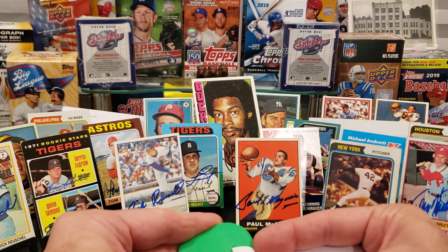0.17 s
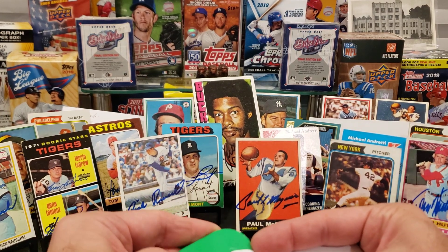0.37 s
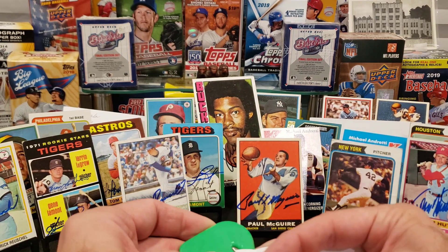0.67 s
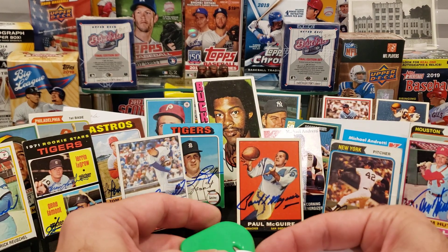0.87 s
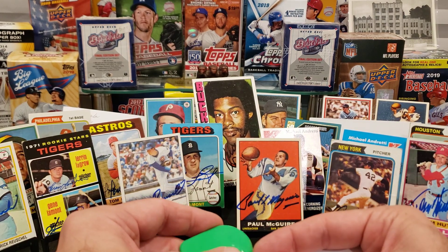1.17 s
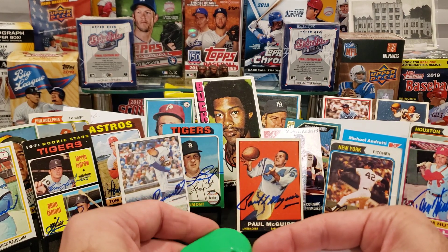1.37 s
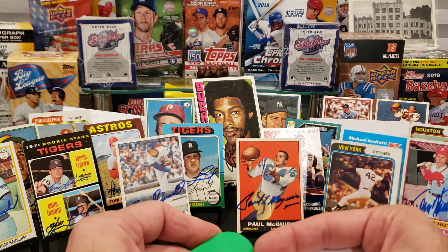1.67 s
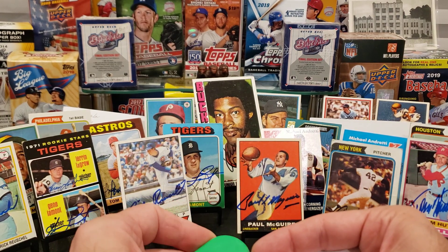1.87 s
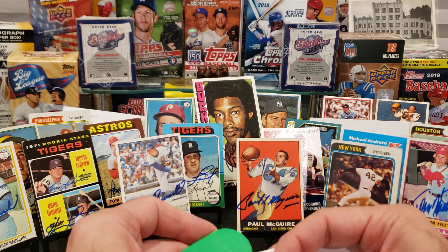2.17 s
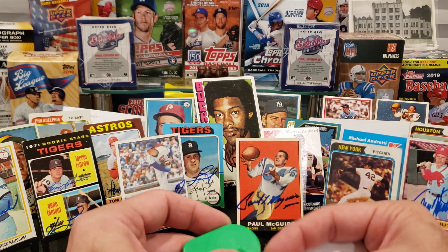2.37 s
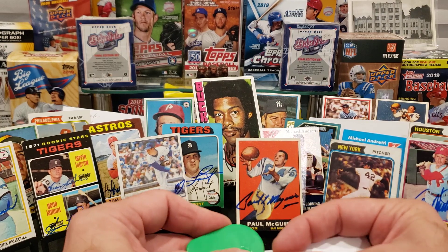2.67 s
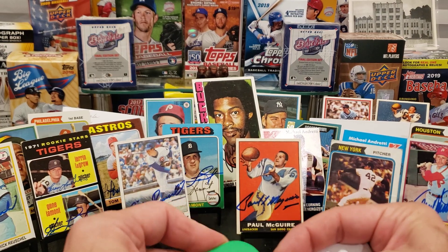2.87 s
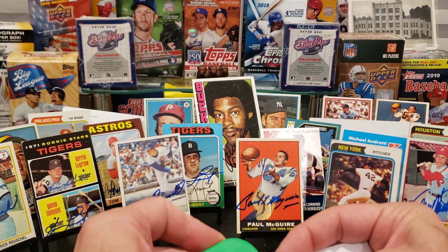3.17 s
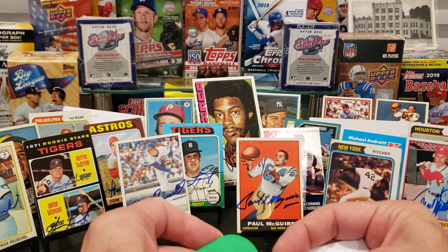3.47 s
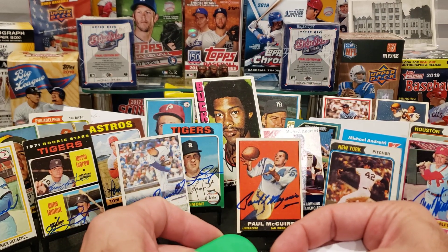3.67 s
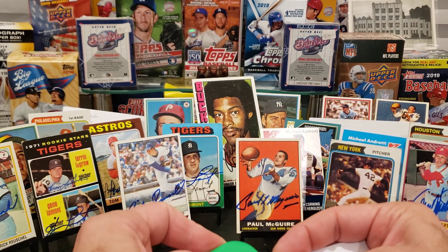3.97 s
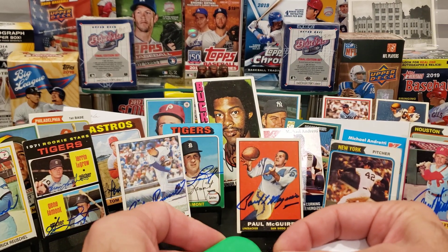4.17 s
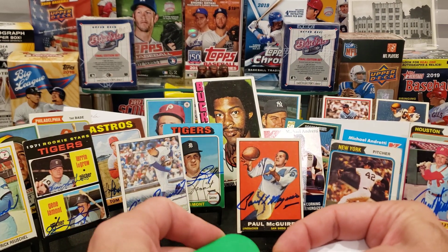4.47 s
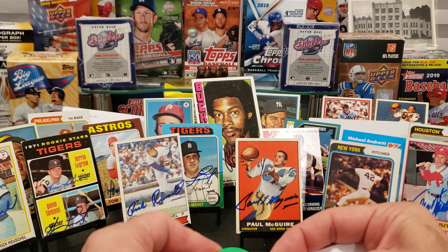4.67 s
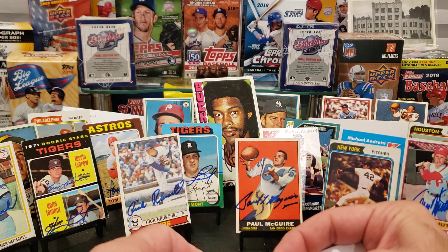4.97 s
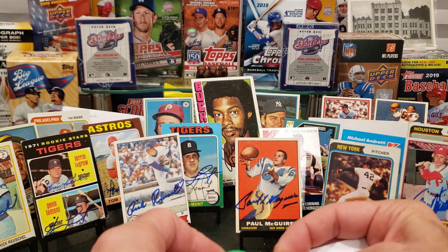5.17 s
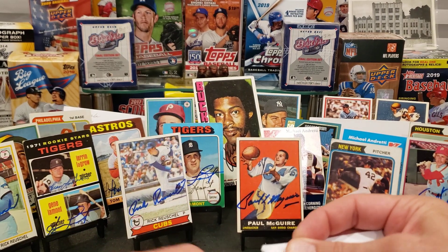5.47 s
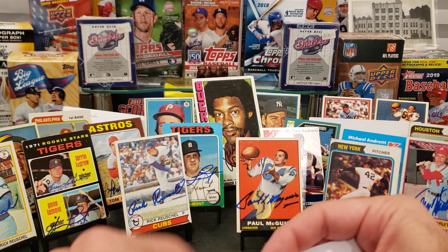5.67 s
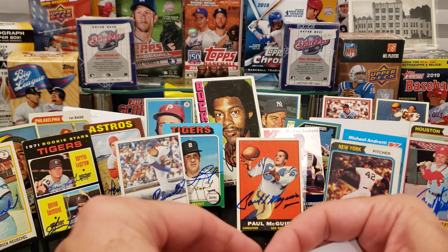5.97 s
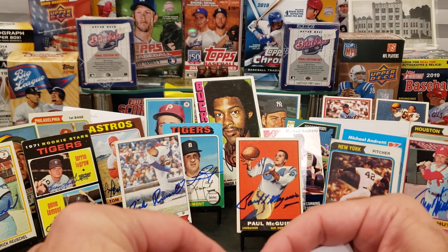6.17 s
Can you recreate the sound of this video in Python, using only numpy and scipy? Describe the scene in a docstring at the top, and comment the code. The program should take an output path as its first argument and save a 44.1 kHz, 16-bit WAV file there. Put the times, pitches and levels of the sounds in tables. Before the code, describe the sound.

Close stereo pickup at a table in a small room. Fingers and a small plastic opener work at a paper envelope: faint scrapes, tiny creases, an early sharp tap with a click, a bump and click on the left a little after two seconds. Crinkles thicken near five seconds, then the fold pops and rips loudly in two jerks, flaps loose and settles. A soft fan hums and hisses to the left.

```python
"""Opening a paper envelope at a table

Close to a stereo pair: an envelope turns in the hands while a small plastic opener works under its flap.
Creases pop and crack as damped modes and noise bursts; strokes scrape as grainy noise; slips swish downward.
The opener taps, bumps and clicks; the fold gives with a pop, rips open and flaps loose in short damped knocks.
The table rings in low modes, a small room answers with noise tails, and a fan hums and hisses to the left."""
import sys
import numpy as np
from scipy import signal
from scipy.fft import rfft, irfft, next_fast_len
from scipy.io import wavfile
from scipy.ndimage import map_coordinates

SR = 44100
rng = np.random.default_rng(int(sys.argv[2]) if len(sys.argv) > 2 else 0)


def master_out(mix):
    """Clip the mix to full scale and print it as 16-bit PCM to the path in sys.argv[1]."""
    frames = np.transpose(np.atleast_2d(mix))
    ceiling = np.clip(frames, -1, 1)
    pcm = np.round(ceiling * 32767).astype(np.int16)
    wavfile.write(sys.argv[1], SR, pcm)


N = 278491
TIME = np.arange(N) / SR
# time axis of one short transient
BLOW = np.arange(4096) / SR

# paper buckles: (time [s], hollow pop level [dB], crack level [dB], fizz level [dB]), before trims
BUCKLES = [(0.021, -50, -81, -93), (0.1201, -47, -54.5, -60), (0.283, -42, -44.5, -58),
           (0.3009, -37.5, -43, -48), (0.4449, -51, -53, -75), (0.457, -47, -55, -70),
           (0.732, -58, -50.5, -52.5), (1.3106, -51.5, -61.5, -80), (1.5177, -52, -82, -58),
           (1.613, -50, -65, -86), (1.7525, -54, -54, -62), (2.0839, -43, -71, -59.5),
           (2.246, -60, -66, -66), (2.309, -53, -50.5, -47.5), (2.348, -74, -71, -55),
           (2.42, -42.5, -44, -40.5), (2.6246, -46.5, -59.5, -80), (2.7127, -51.5, -60.5, -77),
           (2.8116, -36.5, -52, -58), (3.099, -42, -55, -58), (3.1478, -48.5, -44.5, -40.5),
           (3.5114, -49.5, -55.5, -53), (3.904, -54, -62, -57), (4.0442, -47, -66, -77),
           (4.141, -47, -67, -86), (4.5133, -61, -53, -47.5), (4.735, -51.5, -70, -75),
           (4.7812, -53, -63, -69), (4.8705, -42.5, -39.5, -36.5), (4.8856, -38.5, -60, -50),
           (4.8986, -44, -53, -42), (4.9406, -42.5, -77, -61.5), (4.9831, -34, -35.5, -40.5),
           (4.9941, -35.5, -37, -35.5), (5.0714, -54, -47.5, -47), (5.1965, -36.5, -54, -52),
           (5.337, -41, -37, -49), (5.3585, -35, -35, -29.5), (5.5735, -15, -25, -30),
           (5.6516, -38, -39, -43.5), (5.6666, -26, -25, -19), (5.688, -28, -29, -52),
           (5.733, -35, -35, -48), (5.766, -37, -43.5, -58), (5.8229, -47, -44, -51),
           (5.8433, -43, -41.5, -47.5)]
# buckling wanders along the fold, mostly left to right: (time [s], left over right [dB])
BUCKLE_PAN = [(4.8, 5.5), (5.35, -0.5), (5.57, 3), (5.7, -4.5)]
# delay between the microphone ports as the flap tears: (time [s], lead of the left port [samples])
LEFT_LEAD = [(5.45, 1), (5.55, 3)]
# paper slides under fingers or blade:
# (start [s], length [s], fibre scrape [dB], sheet flexing [dB], top-octave sheen over scrape [dB])
STROKES = [(0, 0.13, -68.5, -64, 0), (0.095, .45, -60.5, -55.5, -7), (0.283, .024, -48, -43.5, -5),
           (0.43, .025, -58, -54, -10), (0.487, 0.042, -61.5, -55, 6.5), (0.557, .12, -72, -62.5, -2),
           (0.666, .035, -53.5, -53, -2), (1.235, 0.03, -63, -71, 4), (1.478, 0.038, -62, -73, 5),
           (1.648, 0.084, -76, -57.5, -3), (1.726, 0.025, -59, -62, -3.5), (2.03, .3, -66.5, -69.5, 4.5),
           (2.328, 0.1, -59, -65, 4), (2.46, 0.19, -67, -68, 2), (2.55, 0.044, -56, -65, -2),
           (2.655, 0.29, -63.5, -65.5, -2), (2.81, 0.023, -53, -62, 3), (2.946, 0.047, -53, -57, 1),
           (3.094, 0.13, -60, -63, 1), (3.132, .025, -46, -54, 4), (3.232, 0.25, -68.5, -68.5, 0.5),
           (3.497, 0.055, -66, -64.5, 1), (3.87, 0.065, -56, -67.5, 0.5), (3.945, .2, -67.5, -68.5, 1.5),
           (4.284, .1, -67.5, -70, 0.5), (4.385, 0.071, -52.5, -71, -4), (4.498, 0.039, -48.5, -53, 2.5),
           (4.57, 0.37, -63, -65.5, 0), (4.616, 0.026, -61.5, -70, 10), (4.77, .08, -58, -56.5, 2.5),
           (4.859, 0.028, -44.5, -49, 2.5), (4.982, .027, -44, -49.5, 1), (5.02, .1, -63, -57, -2),
           (5.188, .02, -54, -46, 2), (5.22, .035, -46, -52, 3), (5.27, 0.044, -62, -61, 3.5),
           (5.32, .02, -37, -36, -5), (5.348, .016, -34, -39, 2), (5.39, 0.077, -64.5, -51, 0),
           (5.48, 0.084, -64.5, -63, 4), (5.923, 0.12, -71.5, -67, 1), (6.144, 0.082, -59, -71, -0.5)]
# hands shift their grip: (start [s], length [s], rumble level [dB])
GRIP_SHIFTS = [(0.15, 0.24, -60), (0.501, .04, -51.5), (1.29, .1, -63), (1.583, 0.25, -63.5),
               (2.304, 0.072, -53), (2.8, .22, -68), (3.022, .46, -58.5), (3.977, 0.39, -64.5),
               (4.522, 0.094, -55), (4.845, 0.45, -57.5), (4.99, .12, -53.5), (5.357, 0.11, -46)]
# the fold gives in two jerks: (time [s], fibre scrape [dB], sheet flexing [dB])
TEARS = [(5.573, -35.5, -27), (5.663, -25.5, -31)]
# the freed sheet shakes: (start [s], length [s], sheet flexing [dB], rumble [dB])
FREE_SHAKE = (5.563, .34, -41, -31)
# paper slips over paper: (start [s], length [s], starting pitch [Hz], final pitch [Hz], level [dB])
SLIPS = [(2.977, .11, 1002, 558, -63.5), (3.248, 0.16, 780, 476.5, -65.5), (5.04, 0.023, 900, 600, -49),
         (5.08, .05, 700, 400, -52), (5.12, .085, 1850, 1180, -52), (5.215, 0.042, 2025, 1450, -56.5),
         (5.258, .04, 700, 480, -56), (5.381, .1, 937, 485, -52.5), (6.168, 0.094, 1600, 1031, -62.5)]
# short damped knocks, the opener taps the paper and the envelope flaps:
# (time [s], level [dB], pitch [Hz], t60 [s])
TAPS_AND_FLAPS = [(0.2845, -23.5, 1760, 0.0045), (3.9057, -27.5, 2090, 0.0052), (4.781, -39.5, 497, 0.039),
                  (5.5734, -18.5, 410, 0.042), (5.6125, -26, 820, 0.026), (5.672, -18, 360, 0.054),
                  (5.677, -15.5, 704, 0.049), (5.688, -15, 406, 0.0064), (5.745, -17, 297, 0.019),
                  (5.796, -29.5, 600, 0.022), (5.82, -28, 260, 0.034), (5.834, -31, 750, 0.025),
                  (5.866, -20.5, 290, 0.015), (5.898, -22.5, 556, 0.018), (5.8982, -28, 200, .032),
                  (5.95, -39, 450, .025)]
# the opener bumps the table edge: (time [s], level [dB], left over right [dB])
EDGE_BUMP = (2.3226, -26.5, 15.6)
# modes of that bump: (frequency [Hz], level [dB], t60 [s])
EDGE_BUMP_MODES = [(175, -7.5, .04), (600, 0, .014), (1050, -1.5, .009), (1600, 0, 0.0027)]
# the opener's shell clicks: (time [s], level [dB], left over right [dB])
SHELL_CLICKS = [(0.2832, -35, 2), (2.3712, -27, 13)]
# modes of the plastic shell: (frequency [Hz], level [dB], t60 [s])
SHELL_MODES = [(2840, -3.5, .016), (3400, -0.5, .019)]

# colours of the paper, all as (frequency [Hz], spectral level [dB per Hz])
# fibres scraping
SCRAPE_COLOUR = [(600, -32.5), (1300, -3), (1800, -4), (2400, -0.5), (4200, -0.5), (5900, -1.5), (8300, -6),
                 (10300, -5), (12400, -2), (15500, -5.5)]
# sheet flexing
FLEX_COLOUR = [(50, -62.5), (250, -20), (480, -2), (780, -1.5), (1150, -1), (1650, -3), (2400, -10),
               (5000, -59)]
# low rumble of the handling
RUMBLE_COLOUR = [(20, -39.5), (50, 11), (85, 3.5), (125, 6), (160, -.5), (195, 3), (260, 0), (360, -0.5),
                 (480, -6), (700, -20), (1500, -50)]
# fibres cracking at a crease
CRACK_COLOUR = [(1100, -32.5), (1900, -1.5), (2600, -1), (4200, 1.5), (6200, -2.5), (9000, -22)]
# the highest part of a crease
FIZZ_COLOUR = [(4500, -32), (7500, -2), (10500, 2), (12500, 3), (16000, -1)]
# scrape as heard by the right port: (frequency [Hz], gain [dB])
RIGHT_TINT = [(2000, -2.5), (5000, 1), (8000, -3), (13000, 4.0)]
# soft bumps of the hands on the table: (frequency [Hz], gain [dB])
HAND_BUMP_COLOUR = [(20, -14.5), (45, 3.0), (75, 3.5), (130, -8), (250, -36)]
# deep bass that a small sheet fails to radiate: (frequency [Hz], gain [dB])
SHEET_LOW_CUT = [(20, -36), (40, -20), (70, -8), (130, 0)]

# the table top rings: (frequency [Hz], width [Hz], gain [dB])
TABLE_MODES = [(120.7, 8.9, 4), (194.3, 6.8, 10.5), (362.8, 6.1, 7), (490, 9.2, 1.5), (698, 5.7, 1.5),
               (816, 7, 4), (1019, 4.7, -18)]
# decay of the room: (frequency [Hz], t60 [s])
ROOM_DECAY = [(150, 0.097), (1000, 0.25), (4000, 0.3), (14000, 0.26)]
# difference between the ports in the room tail: (frequency [Hz], gain [dB])
ROOM_SIDE = [(200, -13), (700, -2.5), (2000, 3.5), (4000, -0.5)]
# air moved by the fan: (frequency [Hz], spectral level [dB per Hz])
FAN_AIR_COLOUR = [(20, -10), (45, 8), (120, -0.5), (170, -4), (300, -8), (440, -7.5), (600, -44.5),
                  (1100, -21.5), (3000, -44.5), (8000, -40), (12500, -28), (16000, -24)]
# hiss in the fan's air vents: (frequency [Hz], spectral level [dB per Hz])
FAN_HISS_COLOUR = [(800, -26), (1300, -10.5), (1700, -1.5), (1980, 2), (2250, -2), (2550, -13.5),
                   (2900, -30), (4000, -44)]
# fan motor tones: (frequency [Hz], rms level before flutter and pan [dB])
FAN_TONES = [(118.4, -82), (242.2, -78), (296.1, -71)]

# every hand movement swells, holds and dies away
ATTACK_S, RELEASE_DB_PER_S = 0.019, 328.5
# fingers resting on the paper between movements, before trims
REST_SCRAPE_DB, REST_FLEX_DB, REST_RUMBLE_DB = -76, -79.5, -68
# a tear starts suddenly and fades; its sheen is relative to its scrape
TEAR_ATTACK_S, TEAR_SCRAPE_DB_PER_S, TEAR_FLEX_DB_PER_S, TEAR_SHEEN_DB = 0.0046, 230, 140.5, -4
SHAKE_SAG_DB_PER_S = 7.5
# the sheen of the scrape lies above this frequency
SHEEN_HZ = 7980
# tiny crinkles while the paper slides: rate, level against the friction, life
CRINKLES_PER_S, CRINKLE_DB, CRINKLE_S = 30, -7, .0018
# band limit of the recorder
TOP_HZ = 16000


def snaps():
    """Each buckle thumps the air pocket of the envelope and cracks the fibres at the crease."""
    pops, cracks = np.zeros((2, 2, N))
    for s, pop_db, crack_db, fizz_db in BUCKLES:
        pocket_hz = 1160 * np.exp(.06 * rng.standard_normal())
        # a hard buckle is a single shove; a light one lets the pocket ring
        t60 = np.interp(pop_db, [-42, -18], [.0068, .0036])
        pop = amp(pop_db - 2.5) * burst(ring(pocket_hz, t60, attack=.0003))
        add(pops, s, panned(pop, np.interp(s, *np.transpose(BUCKLE_PAN))))

        # the bending wave crosses the sheet and leaves a brief shiver
        decay = np.exp(-BLOW / 0.0013) + 0.082 * np.exp(-BLOW / 0.015)
        crack = burst(coloured(pair(len(BLOW), apart=1.0) * decay, CRACK_COLOUR))
        fizz = burst(coloured(pair(len(BLOW), apart=0.49) * decay, FIZZ_COLOUR))
        add(cracks, s, amp(crack_db + 2.0) * crack)
        add(cracks, s, panned(amp(fizz_db + 1.4) * fizz, pan_db=-4.5))
    return pops + off_centre(cracks)


def rubbing():
    """Fibres catch and let go under the blade and fingers; the sheet flexes and the hands shift."""
    scrape_db, sheen_db, flex_db, rumble_db = handling()
    catches = grains(rate=500, scatter_db=4.5, life=.0004, bed=.7)
    crinkles = amp(CRINKLE_DB) * grains(rate=CRINKLES_PER_S, scatter_db=3, life=CRINKLE_S, bed=0)

    fibres = pair(N, apart=1.0) * np.hypot(catches, crinkles)
    left = coloured(fibres[0], SCRAPE_COLOUR)
    right = coloured(coloured(fibres[1], SCRAPE_COLOUR), RIGHT_TINT)
    friction = off_centre(unit(np.array([left, right])))
    low_pass = signal.butter(2, SHEEN_HZ, fs=SR, output='sos')
    dull = signal.sosfiltfilt(low_pass, friction)
    sheen = friction - dull
    scrape = amp(scrape_db - 1.0) * dull + amp(sheen_db - 2.0) * sheen

    creases = np.hypot(grains(rate=300, scatter_db=3, life=.001, bed=.5), crinkles)
    flex_noise = coloured(pair(N, apart=0.78) * creases, FLEX_COLOUR)
    flex = amp(flex_db - 5.5) * unit(flex_noise)

    nudges = grains(rate=120, scatter_db=4.2, life=0.0029, bed=0.38)
    rumble_noise = coloured(pair(N, apart=0.3) * nudges, RUMBLE_COLOUR)
    rumble = amp(rumble_db - 5) * unit(rumble_noise)

    # the hands bump the table softly however loud the paper gets
    bump_noise = coloured(pair(N, apart=0.24), HAND_BUMP_COLOUR)
    bumps = amp(np.minimum(rumble_db, -52) - 10.0) * unit(bump_noise)
    return scrape + panned(flex + coloured(rumble, SHEET_LOW_CUT) + bumps, pan_db=2.5)


def handling():
    """Levels in dB of scrape, its sheen, flexing and rumble; all movements add in power."""
    rest = amp([REST_SCRAPE_DB, REST_SCRAPE_DB, REST_FLEX_DB, REST_RUMBLE_DB])
    scrape, sheen, flex, rumble = rest[:, None] ** 2 * np.ones(N)
    for s, length, scrape_db, flex_db, sheen_db in STROKES:
        power = movement(s, length) ** 2
        scrape += amp(scrape_db) ** 2 * power
        sheen += amp(scrape_db + sheen_db) ** 2 * power
        flex += amp(flex_db) ** 2 * power
    for s, length, db in GRIP_SHIFTS:
        rumble += (amp(db) * movement(s, length)) ** 2
    for s, scrape_db, flex_db in TEARS:
        power = (amp(scrape_db) * jerk(s, TEAR_SCRAPE_DB_PER_S)) ** 2
        scrape += power
        sheen += amp(TEAR_SHEEN_DB) ** 2 * power
        flex += (amp(flex_db) * jerk(s, TEAR_FLEX_DB_PER_S)) ** 2
    s, length, flex_db, rumble_db = FREE_SHAKE
    shake = movement(s, length) * jerk(s, SHAKE_SAG_DB_PER_S)
    flex += (amp(flex_db) * shake) ** 2
    rumble += (amp(rumble_db) * shake) ** 2
    return 10 * np.log10([scrape, sheen, flex, rumble])


def movement(start, length):
    """Envelope of a hand movement: eased attack, hold, release."""
    swell = .5 + .5 * np.tanh((TIME - start - ATTACK_S / 2) / (ATTACK_S / 2))
    return swell * amp(-RELEASE_DB_PER_S * np.clip(TIME - start - length, 0, 1))


def jerk(start, db_per_s):
    """Envelope of a tear: a sudden start and a steady fade."""
    onset = np.clip((TIME - start) / TEAR_ATTACK_S, 0, 1)
    return onset * amp(-db_per_s * np.clip(TIME - start, 0, 1))


def grains(rate, scatter_db, life, bed):
    """Envelope of many tiny slips of uneven size, over smooth friction."""
    sizes = amp(scatter_db * np.clip(rng.standard_normal(N), -2, 2))
    hits = (rng.random(N) < rate / SR) * sizes
    power = signal.lfilter([1], [1, -np.exp(-1 / (life * SR))], hits ** 2)
    return np.sqrt((power / power.mean() + bed) / (1 + bed))


def slips():
    """Narrow swishes that fall in pitch as the air pocket between the sheets widens."""
    out = np.zeros(N)
    low_pass = signal.butter(2, 170, fs=SR)
    for s, length, from_hz, to_hz, db in SLIPS:
        progress = np.clip((TIME - s) / length, 0, 1)
        pitch = from_hz * (to_hz / from_hz) ** progress
        phase = 2 * np.pi * np.cumsum(pitch) / SR
        # slow noise on two quadrature carriers makes a narrow band around the pitch
        friction = signal.lfilter(*low_pass, rng.standard_normal((2, N)))
        swish = unit(friction[0] * np.sin(phase) + friction[1] * np.cos(phase))
        out += amp(db) * np.sin(np.pi * progress) * swish
    return panned(out, pan_db=3.5)


def taps_and_flaps():
    """The opener taps the paper and the envelope flaps: short damped knocks, each at its listed pitch."""
    out = np.zeros((2, N))
    for s, db, hz, t60 in TAPS_AND_FLAPS:
        add(out, s, panned(amp(db) * contact(hz, t60), pan_db=3.5))
    return out


def opener():
    """The opener bumps the table edge and its shell clicks, each a sum of damped modes."""
    out = np.zeros((2, N))
    contacts = [(EDGE_BUMP, EDGE_BUMP_MODES)] + [(click, SHELL_MODES) for click in SHELL_CLICKS]
    for (s, db, pan_db), modes in contacts:
        knock = sum(amp(db + mode_db) * contact(hz, t60) for hz, mode_db, t60 in modes)
        add(out, s, panned(knock, pan_db))
    return out


def contact(hz, t60):
    """A blunt contact: one heavily damped mode with a short scuff around its pitch."""
    mode = ring(hz, t60, attack=0.000097)
    touch = rng.standard_normal(len(BLOW)) * np.exp(-BLOW / .004)
    scuff = coloured(touch, [(hz / 3, -18), (hz, 0), (hz * 2, -6), (hz * 8, -40)])
    return amp(-6.0) * (mode / abs(mode).max() + .4 * scuff / abs(scuff).max())


def ring(hz, t60, attack):
    """One damped mode."""
    decay = 10 ** (-3 * BLOW / t60)
    return np.sin(2 * np.pi * hz * BLOW) * decay * (1 - np.exp(-BLOW / attack))


def table(x):
    """Low resonances of the table under the hands."""
    m = next_fast_len(N + SR // 2)
    f = np.fft.rfftfreq(m, 1 / SR)
    response = sum(amp(db) * 1j * f * width / (hz * hz - f * f + 1j * f * width)
                   for hz, width, db in TABLE_MODES)
    return irfft(rfft(x, m) * response, m)[:, :N]


def room(x, count=24):
    """Table clutter and near walls answer with noise tails, redrawn at random for each stretch."""
    out = np.zeros((2, N))
    # equal stretches of time
    for index in np.array_split(np.arange(N), count):
        hz, t, z = signal.stft(rng.standard_normal((2, SR // 2)), SR, nperseg=256)
        decay = 10 ** (-3 * t / along(ROOM_DECAY, hz)[:, None])
        tail = signal.istft(z * decay, SR, nperseg=256)[1]
        age = np.arange(tail.shape[1]) / SR
        # stronger early reflections, after a short gap
        tail *= (1 + 0.71 * np.exp(-age / 0.013)) * (1 - np.exp(-(age / 0.0013) ** 2))
        # long waves reach both ports alike
        side = coloured(tail[1], ROOM_SIDE)
        tail = np.array([tail[0] + side, tail[0] - side]) / np.linalg.norm(tail)
        add(out, index[0] / SR, signal.fftconvolve(x[:, index], tail, axes=1))
    return out


def fan():
    """Moving air, a narrow hiss from the left and slightly unsteady motor tones."""
    air = amp(-75.5) * unit(coloured(pair(N, apart=0.33), FAN_AIR_COLOUR))
    hiss = amp(-69.5) * unit(coloured(pair(N, apart=4.5), FAN_HISS_COLOUR))
    hum = np.zeros(N)
    for hz, db in FAN_TONES:
        phase = 2 * np.pi * hz * TIME + 0.25 * wobble(4.9)
        hum += amp(db) * np.sqrt(2) * np.sin(phase)
    flutter = amp(1.8 * wobble(7))
    return panned(air + hum * flutter, pan_db=6.5) + panned(hiss, pan_db=15.5)


def wobble(rate):
    """A smooth random curve, rate knots a second."""
    knots = rng.standard_normal(int(N * rate / SR) + 4)
    return map_coordinates(knots, [TIME * rate])


def pair(n, apart):
    """Two noises that share a common part; apart is the weight of their own parts."""
    return unit(rng.standard_normal(n) + apart * rng.standard_normal((2, n)))


def coloured(x, points):
    """Causal minimum-phase filter with the gain of (frequency [Hz], gain [dB]) points."""
    n = x.shape[-1]
    m = 2 * next_fast_len(n)
    gain = amp(along(points, np.fft.rfftfreq(m, 1 / SR)))
    # folding the cepstrum forward in time makes the filter causal
    cepstrum = irfft(np.log(gain))
    cepstrum[1:m // 2] *= 2
    cepstrum[m // 2 + 1:] = 0
    return irfft(rfft(x, m) * np.exp(rfft(cepstrum)), m)[..., :n]


def along(points, hz):
    """Read (frequency [Hz], value) points on a log axis."""
    f, v = np.transpose(points)
    return np.interp(np.log(hz + 1), np.log(f), v)


def panned(x, pan_db):
    """Lean a sound to the left by pan_db."""
    return x * amp(np.array([[pan_db], [-pan_db]]) / 2)


def off_centre(x):
    """The right port hears the paper slightly later."""
    lead = np.interp(TIME, *np.transpose(LEFT_LEAD))
    sample = np.arange(N)
    return np.array([x[0], np.interp(sample - lead, sample, x[1])])


def add(track, s, sound):
    """Mix a sound in at s seconds."""
    part = track[:, round(s * SR):][:, :sound.shape[-1]]
    part += sound[:, :part.shape[1]]


def amp(db):
    """Decibels to gain."""
    return 10 ** (np.asarray(db) / 20)


def unit(x):
    """Scale to rms 1."""
    return x / np.sqrt(np.mean(x ** 2) + 1e-20)


def burst(x):
    """Scale a transient to the energy of 4 ms at rms 1."""
    return x * np.sqrt(.004 * SR / np.mean(np.sum(x ** 2, axis=-1)))


def scene():
    """Close paper sounds, the table, the room and the fan."""
    # a small sheet radiates almost no deep bass
    clicks = coloured(snaps(), SHEET_LOW_CUT)
    thumps = coloured(opener() + taps_and_flaps(), SHEET_LOW_CUT)
    rustle = rubbing() + slips()
    wood = table(amp(-5.5) * (clicks + thumps) + amp(-11.0) * rustle)
    wet = room(amp(-3.5) * clicks + amp(-12.0) * thumps + amp(-5.5) * rustle)
    return clicks + thumps + rustle + wood + wet + fan()


def record(dry):
    """The recorder rounds off the highest peaks and keeps nothing above its band limit."""
    rounded = dry / (1 + (dry / .7) ** 4) ** .25
    m = next_fast_len(N + SR // 2)
    in_band = np.fft.rfftfreq(m, 1 / SR) < TOP_HZ
    return irfft(rfft(rounded, m) * in_band, m)[:, :N]


dry = scene()
out = record(dry)
master_out(out)
```